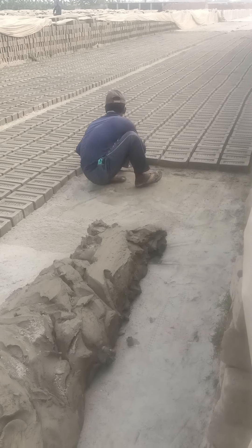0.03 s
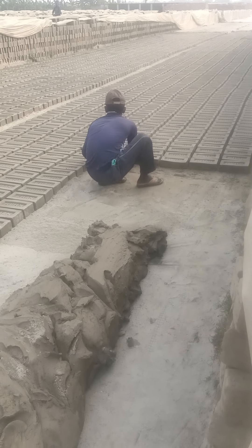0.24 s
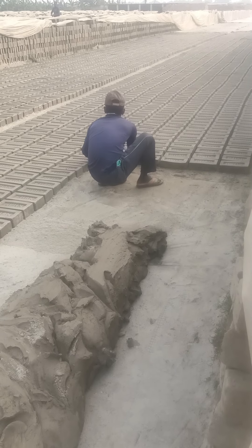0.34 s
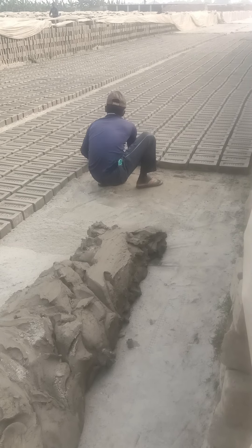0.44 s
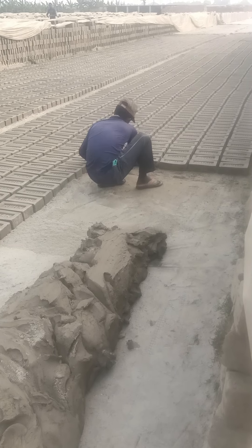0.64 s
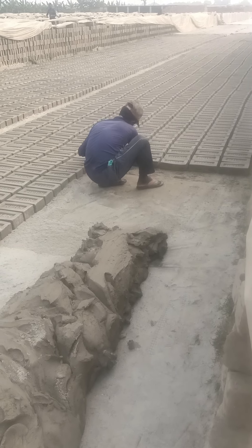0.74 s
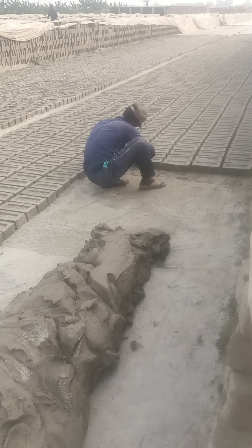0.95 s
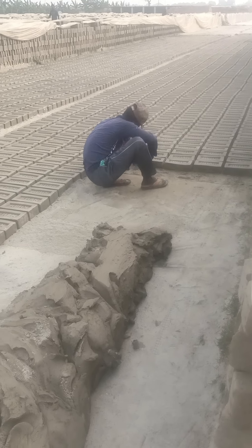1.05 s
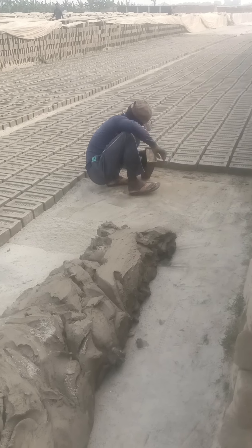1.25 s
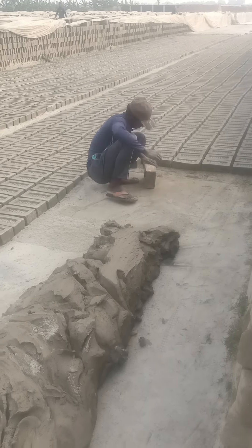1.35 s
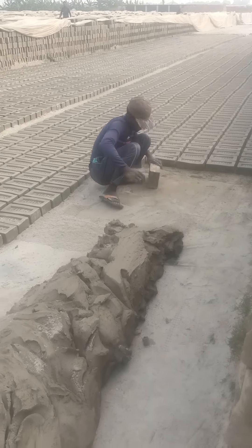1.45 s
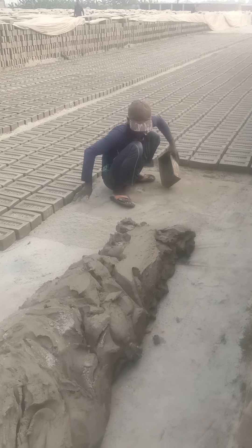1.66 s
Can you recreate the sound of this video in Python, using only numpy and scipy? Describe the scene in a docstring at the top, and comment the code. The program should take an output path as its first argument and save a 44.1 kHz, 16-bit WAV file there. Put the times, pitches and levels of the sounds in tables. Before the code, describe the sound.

A few close, hollow thuds from a brick mould and wet clay over soft outdoor rumble.

```python
"""A quiet, open brick yard, with dull handling knocks and light rubbing right at the left microphone.
Each knock rings one spot of a small damped body, probably the recorder's casing, and reaches
the right side only faint and muffled. Air rumbles softly on the ports, wind puffs on the right one,
and two thin chirps come from far off."""
import sys
import numpy as np
from scipy import signal
from scipy.fft import rfft, irfft
from scipy.io import wavfile

SR = 44100
rng = np.random.default_rng(int(sys.argv[2]) if len(sys.argv) > 2 else 0)


def generate_wav(sig):
    """Save sig (samples, or channels by samples) to the path in sys.argv[1] as 16-bit PCM at SR."""
    pcm = np.round(np.clip(np.atleast_2d(sig).T, -1, 1) * 32767).astype(np.int16)
    wavfile.write(sys.argv[1], SR, pcm)


N = 74970
T = np.arange(N) / SR


def from_db(db):
    """Decibels to gain."""
    return 10 ** (np.asarray(db) / 20)


def rms_one(x):
    """Scale to unit power."""
    return x / np.sqrt(np.mean(x ** 2) + 1e-20)


def at_hz(points, hz, column=1):
    """Read a column of a table on a log-frequency axis."""
    table = np.array(points)
    return np.interp(np.log(hz), np.log(table[:, 0]), table[:, column])


def filtered(x, hz, kind="low", order=2):
    """Butterworth filter."""
    return signal.sosfilt(signal.butter(order, hz, kind, fs=SR, output="sos"), x)


def noise(spectrum):
    """Noise of unit power with the given colour."""
    hz = np.maximum(np.fft.rfftfreq(N, 1 / SR), 1)
    return rms_one(irfft(rfft(rng.standard_normal(N)) * from_db(at_hz(spectrum, hz)), N))


def flicker(rate_hz):
    """Random wavering of spread 1."""
    return rms_one(filtered(rng.standard_normal(N), rate_hz))


def swell(start_s, length_s, power=1):
    """One arch that rises and falls; a higher power softens its ends."""
    progress = np.clip((T - start_s) / length_s, 0, 1)
    return (4 * progress * (1 - progress)) ** power


def decay(t, t60):
    """Exponential fall of 60 dB in t60 seconds."""
    return np.exp(-np.log(1000) * t / t60)


def air():
    """A steady bed of outdoor air, rumbling softly on both ports."""
    # colour of the air on each side: frequency_hz, relative_db
    left_colour = [(25, 1), (60, 1.5), (120, 0), (300, -14.5), (500, -25.5), (800, -35), (1500, -32),
                   (3000, -44), (6900, -58.5), (8500, -49), (16000, -65)]
    right_colour = [(25, -1), (120, -6), (300, -30), (800, -48), (1500, -45.5), (3000, -56), (10500, -69)]
    return np.array([from_db(-45) * noise(left_colour), from_db(-45.5) * noise(right_colour)])


def stroke_resonances(depth_db=5, spacing_hz=130):
    """One stroke's own narrow resonances: random peaks and dips across the spectrum, as gains."""
    position = np.fft.rfftfreq(N, 1 / SR) / spacing_hz
    heights = rng.uniform(-0.92, 1, int(position[-1]) + 2) * np.sqrt(3)
    return from_db(depth_db * np.interp(position, np.arange(len(heights)), heights))


def rubs(roughness_db=0.5):
    """Short sliding strokes at the left microphone: a fine friction hiss over a duller grain."""
    # strokes: start_s, length_s, hiss_level_db, grain_over_hiss_db
    strokes = [(0, 0.16, -59, 1), (0.156, 0.067, -71, 14), (0.254, 0.25, -76.5, 16),
               (0.475, 0.32, -78.5, 15.5), (0.773, 0.17, -62.5, 5.5), (1.183, 0.083, -66.5, 9.5),
               (1.33, 0.16, -61.5, 11), (1.433, 0.098, -57.5, 10.5), (1.512, 0.22, -61.5, 9)]
    # colours of the two friction layers: frequency_hz, relative_db
    hiss_colour = [(6000, -15.5), (7200, -14), (8600, 5.5), (9600, 4.5), (11000, -4.5), (13000, -4),
                   (15500, -29)]
    grain_colour = [(150, 11), (400, 11.5), (800, -8), (1550, 3.5), (3000, -4.5), (5800, -13.5),
                    (6900, -42.5)]
    hiss, grain, left = noise(hiss_colour), noise(grain_colour), 0
    for start_s, length_s, level_db, grain_db in strokes:
        friction = hiss + from_db(grain_db) * irfft(rfft(grain) * stroke_resonances(), N)
        left = left + from_db(level_db) * swell(start_s, length_s, power=1.6) * friction
    return np.array([left * from_db(roughness_db * flicker(rate_hz=570)), np.zeros(N)])


def knocks(contact_s=0.0007, rise_cycles=0.45, grip_waver=0.014, tail_db=-21.5, tail_t60_s=0.16):
    """Each blow rings the struck spot's modes and adds a short crack; harder contact is brighter."""
    # modes of the four spots, before each blow scales them: pitch_hz, level_db, t60_s
    thud = [(170, -3, .08), (222, 3.5, .05), (392, -3.6, .06), (424, -6, .095), (452, -19, .12),
            (679, -20, .06), (830, -24, .045), (1225, -21, .049)]
    hollow = [(248.0, -19.0, 0.139), (364.0, -3.4, 0.042), (490.0, -10.5, 0.04), (565.0, -14.8, 0.107),
              (837.0, -24.6, 0.062), (1014.0, -24.8, 0.076), (1405.0, -8.3, 0.021), (1527.0, -11.7, 0.028),
              (1970.0, -18.3, 0.042), (2496.0, -31.7, 0.054), (2887.0, -23.9, 0.023)]
    clack = [(214, -14, .027), (517, -30, .1), (1115, -29, .07), (1240, -35, .085), (1585, -38, .09),
             (2080, -47, .1)]
    tap = [(355, -19, .14), (480, -2, .014), (621, -25, .07), (790, -16.5, .041), (1136, -28, .065),
           (1220, -13.3, .024), (1613, -35, .08)]
    spots = dict(thud=thud, hollow=hollow, clack=clack, tap=tap)
    # the crack, the dense unpitched part of the ring: frequency_hz, relative_db, base_t60_s
    crack = [(197, -10.5, 0.085), (384, -6.5, 0.15), (670, -7, 0.016), (930, -9, 0.064),
             (1420, -1.5, 0.045), (3000, -12.5, 0.033), (5250, -15, 0.046), (6250, -30, 0.013),
             (8640, 0.5, .03), (13100, -17, 0.0077)]
    # the crack's four EQ points: low_hz, middle_hz, edge_hz, tick_hz
    eq_hz = [400, 1400, 3000, 9000]
    # blows: start_s, spot, mode_level_db, tilt_db_per_octave, pitch_factor, ring_time_factor,
    # crack_low_db, crack_middle_db, crack_edge_db, crack_tick_db, right_send_db
    blows = [ (.165, "thud", -45, -2.5, 1.2, 3.5, -43.5, -74.5, -72, -75.5, -13),
             (.2130, "thud", -1, 0, 0.99, 1.11, -19.5, -27, -36, -41.5, -16),
             (0.3381, "thud", -22.5, -9.5, 1.015, 1.06, -23.5, -39.5, -42, -48.5, -17.5),
             (0.423, "thud", -47, -10.5, 1.16, 2.1, -48, -71, -82, -75, -16),
             (0.508, "thud", -46.5, -7, 1.25, 2.5, -43.5, -87, -78, -89, -18),
             (0.5632, "clack", -3, 0, 1.01, 1.44, -36.5, -43, -43.5, -52.5, -18.5),
             (0.625, "hollow", -36, -2.5, 1.14, 0.56, -70, -73, -81, -85, -21),
             (0.8723, "hollow", -1, 0.03, 0.99, 1.02, -23, -18, -23, -30.5, -12),
             (1.4377, "tap", -3, 0, 1, 1.41, -27.5, -30.5, -36, -53, -20),
             (1.514, "tap", -21, -4, 1.67, 0.61, -47, -28.5, -43, -55, -20),
             (1.5624, "tap", -11.5, -5, 1.63, 0.66, -25, -32, -37, -78, -27),
             (1.569, "tap", -9, -3, 1.3, 0.58, -27, -34.5, -39.5, -53, -13.5)]
    out, t = np.zeros((2, N + SR)), T[:SR // 3]
    grip = flicker(rate_hz=70)  # the hand's shifting grip makes each ring waver in pitch
    edges_hz = 140 * 2 ** (np.arange(22) / 3)  # third octaves
    centres_hz = np.sqrt(edges_hz[1:] * edges_hz[:-1])
    bands = [rms_one(filtered(rng.standard_normal(N + len(t)), pair, "band"))
             for pair in zip(edges_hz, edges_hz[1:])]
    attack = 1 - np.exp(-t / contact_s)  # the force builds
    tail = from_db(tail_db) * decay(t, tail_t60_s)
    for start_s, spot, level_db, tilt_db, pitch, ring, *eq_db, right_db in blows:
        first, blow = int(start_s * SR), 0
        span = slice(first, first + len(t))
        for k, (hz, db, t60) in enumerate(spots[spot]):
            waver = 1 + grip_waver * np.roll(grip, rng.integers(N))[:len(t)]
            phase = 2 * np.pi * hz * pitch * np.cumsum(waver) / SR
            gain = from_db(level_db + db + tilt_db * np.log2(hz / 400))
            rise = 1 - np.exp(-(t * hz / rise_cycles) ** 2)
            mode = gain * rise * decay(t, t60 * ring) * np.sin(phase)
            blow = blow + (-1) ** k * mode  # neighbouring modes swing against each other
        crack_eq = list(zip(eq_hz, eq_db))
        for hz, band in zip(centres_hz, bands):
            envelope = attack * (decay(t, at_hz(crack, hz, column=2) * ring) + tail)
            blow = blow + from_db(at_hz(crack, hz) + at_hz(crack_eq, hz)) * envelope * band[span]
        out[:, span] += blow * from_db([[0], [right_db]])
    left, right = filtered(out[:, :N] + 1e-18, 100, "high")  # the small body carries no deep bass
    return np.array([left, far_side(right)])


def far_side(x):
    """The way to the right microphone takes away most of the treble."""
    return filtered(filtered(x, 520, order=1), 1900, order=1)


def wind_puffs():
    """Wind brushes the right port in short, deep swells."""
    # puffs: start_s, length_s, level_db
    puffs = [(0.57, 0.09, -46.5), (0.696, 0.23, -42.5), (1.456, 0.28, -39)]
    # colour of the buffeting: frequency_hz, relative_db
    wind_colour = [(40, 0.5), (80, -2), (150, -11.5), (1000, -85)]
    envelope = sum(from_db(db) * swell(start_s, length_s) for start_s, length_s, db in puffs)
    return np.array([np.zeros(N), envelope * noise(wind_colour)])


def chirps(pitch_waver=0.019, flutter_db=4):
    """Faint fluttering whistles far off on the left, perhaps birds."""
    # calls: start_s, length_s, pitch_hz, level_db
    calls = [(1.121, 0.04, 2067, -61.5), (1.26, 0.092, 2560, -69)]
    phase_per_hz = 2 * np.pi * np.cumsum(1 + pitch_waver * flicker(rate_hz=120)) / SR
    whistles = sum(from_db(db) * swell(start_s, length_s) * np.sin(hz * phase_per_hz)
                   for start_s, length_s, hz, db in calls)
    return np.array([whistles * from_db(flutter_db * flicker(rate_hz=60)), np.zeros(N)])


def scene():
    """Close knocks and rubs over the quiet yard."""
    return knocks() + rubs() + wind_puffs() + air() + chirps()


def record(dry, ceiling=0.92, stopband_hz=16300):
    """Soft clipping rounds the highest peaks, and a steep low-pass cuts the very top."""
    rounded = dry / (1 + (dry / ceiling) ** 6) ** (1 / 6)
    return signal.sosfilt(signal.cheby2(12, 70, stopband_hz, fs=SR, output="sos"), rounded)


dry = scene()
out = record(dry)
generate_wav(out)
```